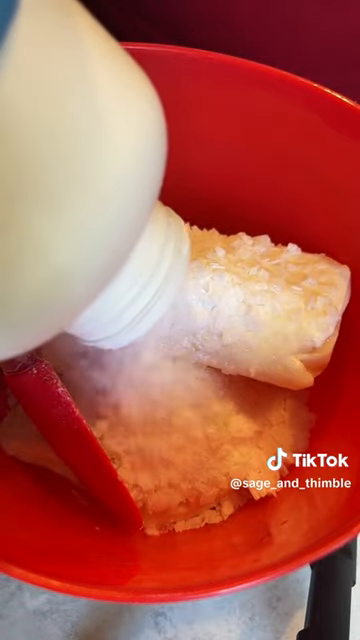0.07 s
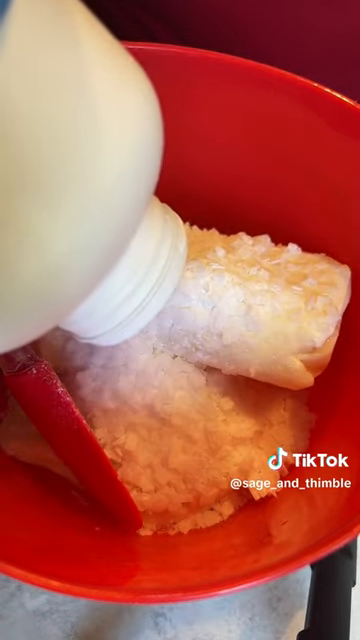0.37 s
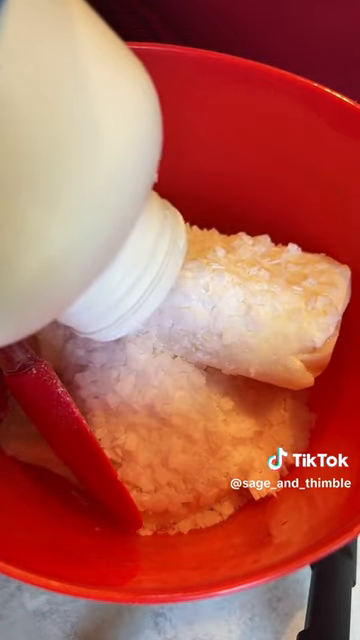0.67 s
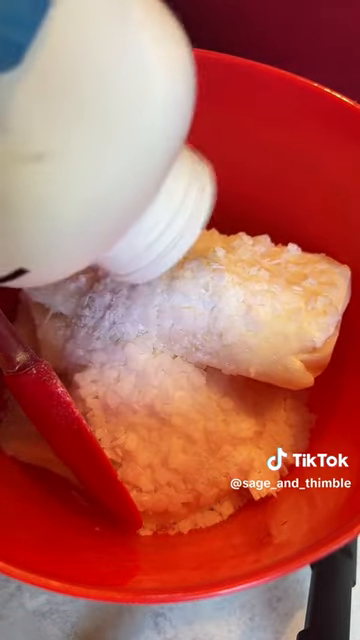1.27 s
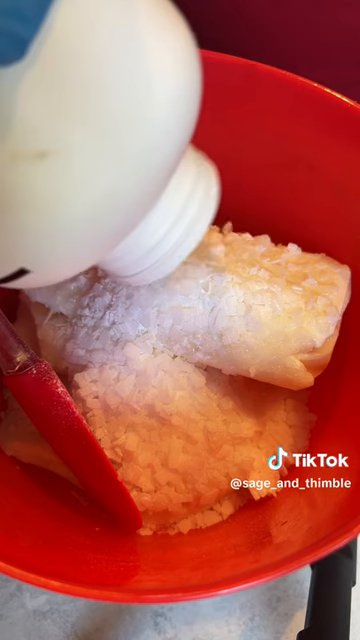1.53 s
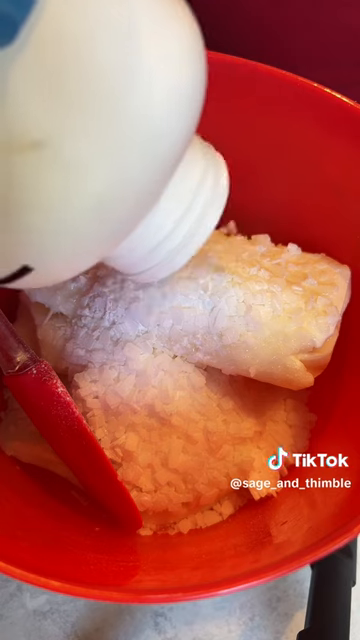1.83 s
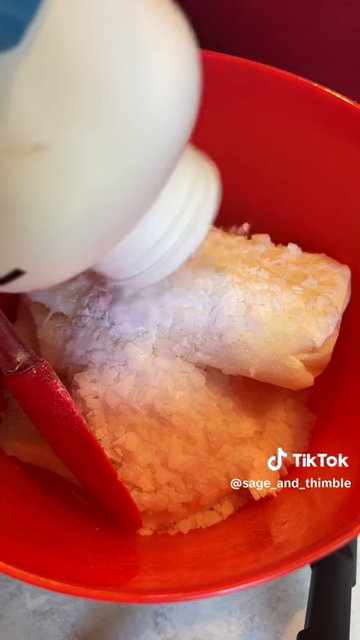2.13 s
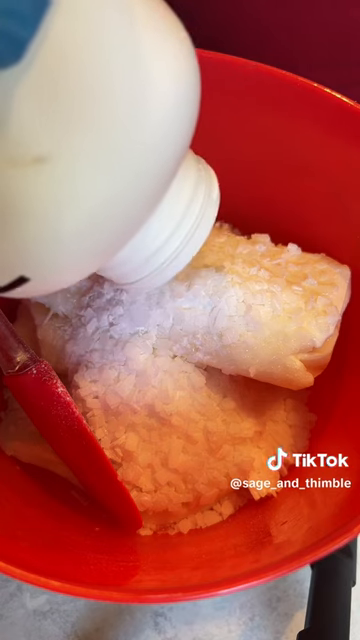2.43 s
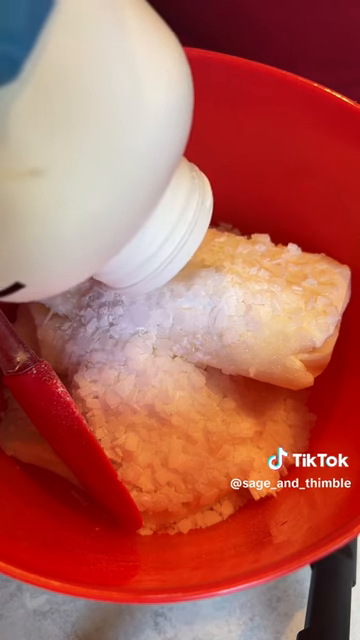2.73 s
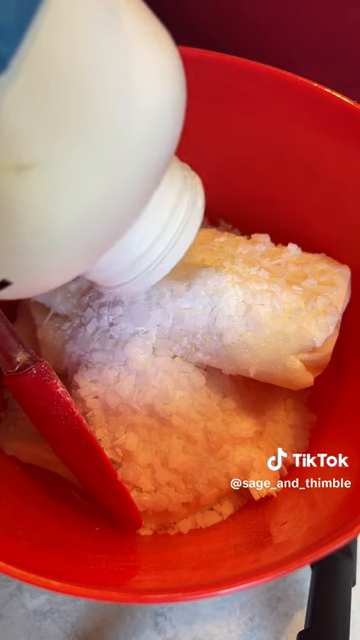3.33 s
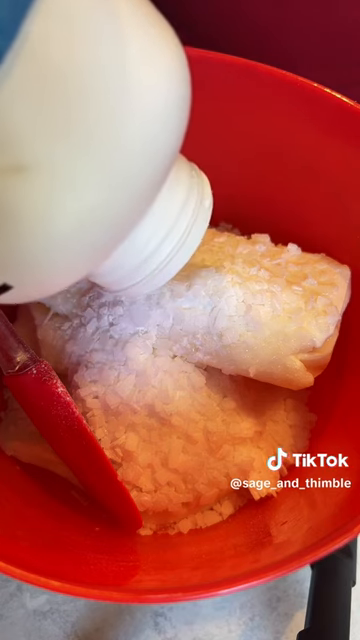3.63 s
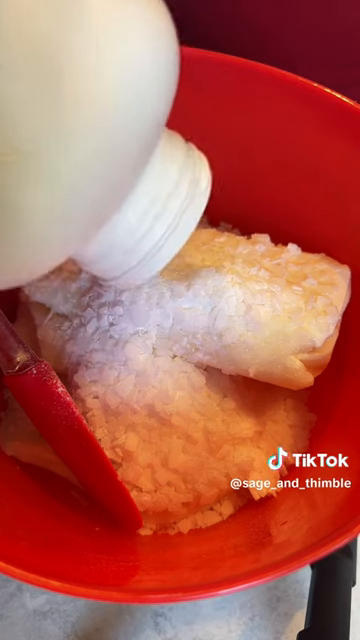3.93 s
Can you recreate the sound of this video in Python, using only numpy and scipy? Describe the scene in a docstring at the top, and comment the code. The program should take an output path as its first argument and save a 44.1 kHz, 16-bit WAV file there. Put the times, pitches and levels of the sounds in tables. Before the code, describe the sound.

Dry granules patter and tick as they are shaken from a plastic bottle onto food.

```python
"""A fine patter swells and stops, dotted with ticks: dry granules shaken from a plastic bottle
onto food in a bowl, close to the microphone. The stream is thousands of tiny impacts a second;
lumps tick against the bottle neck and the bowl, and a faint, high hiss comes and goes.
Low, uneven buffeting with soft bumps reaches the microphone; an appliance hums in the small room."""
import sys
import numpy as np
from scipy import signal
from scipy.fft import rfft, irfft, next_fast_len
from scipy.io import wavfile
from scipy.ndimage import uniform_filter1d, map_coordinates

SR = 44100
rng = np.random.default_rng(int(sys.argv[2]) if len(sys.argv) > 2 else 0)


def transcribe(signal):
    """Save signal, clipped to [-1, 1], as a 16-bit WAV file at the path in sys.argv[1]."""
    frames = np.atleast_2d(signal).T
    limited = np.clip(frames, -1, 1)
    pcm = np.round(limited * 32767).astype(np.int16)
    wavfile.write(sys.argv[1], SR, pcm)


N = 176400


def stream():
    """Granules land in little clumps, as loud as the flow."""
    # flow envelope: t/s, level/dB
    flow = [(0, -51.5), (.12, -49), (.14, -66), (.2, -60), (.26, -60), (.34, -53), (.42, -63.5), (1.1, -69),
            (1.18, -46.5), (1.215, -54), (1.31, -46), (1.34, -53.5), (1.385, -46), (1.48, -56),
            (1.51, -46.5), (1.55, -54), (1.67, -46), (1.72, -54), (1.745, -53), (1.8, -47), (1.855, -48),
            (1.885, -44), (1.93, -54.5), (1.97, -43.5), (2.01, -50), (2.06, -40.5), (2.13, -45),
            (2.18, -43.5), (2.23, -55.5), (2.28, -44.5), (2.345, -49), (2.41, -47.5), (2.495, -56),
            (2.525, -58.5), (2.7, -75)]
    # impact spectrum: f/Hz, level/dB
    colour = [(300, -26), (480, -12.5), (600, 5.5), (750, -14), (1500, -1), (2200, 0.5), (2480, 3),
              (2750, -3.5), (3150, -1), (4100, -2), (4700, -5), (8300, -7.5), (10500, -16.5), (12000, -25),
              (14000, -11.5), (16000, -29)]
    gain_db, flutter_db, flutter_per_s = -1, 1.4, 110
    return patter(colour) * amp(curve(flow) + gain_db + flutter_db * wobble(flutter_per_s))


def patter(colour):
    """Tiny impacts of random time and strength, each ringing with the colour; rms 1."""
    grains_per_s, spread_db = 4500, 3.8
    lands = rng.random(N) < grains_per_s / SR
    grains = lands * rng.standard_normal(N) * amp(spread_db * rng.standard_normal(N))
    return unit(signal.fftconvolve(grains, ring(colour))[:N])


def lump_ticks(size=2200):
    """Each lump snaps on contact and crumbles for a few milliseconds; a short, faint diffuse tail follows."""
    # lump and bottle ticks: t/s, level/dB, bass/dB, treble/dB, top octave/dB (bands re the middle)
    ticks = [(.0028, -32.5, -29, -11, -11), (.0093, -33.5, -23, -5, -13), (0.1473, -27.5, -34, -8, -21),
             (0.1813, -33.5, -18, -6, -17), (0.1856, -32, -16, 1, -8), (0.2, -34, -19, 0, -14),
             (.2992, -32.5, -11.5, -13, -23), (.333, -44, -21, -6, -27), (.3468, -44.5, -18, -9, -24),
             (0.4695, -42, -6, 13, -4), (0.7631, -34.5, -25, 0, -14), (1.255, -43.5, -5, 0, 0),
             (1.3832, -38.5, 0.5, 0, -8), (1.42, -45, -1, -8, -22), (1.588, -39, -10, -10.5, -23),
             (1.633, -44, -10, -4, -5), (1.659, -35.5, 2.5, 2, -15), (1.6715, -31.5, -8, -17, -27),
             (1.7099, -37, -2, -4, -11), (1.7838, -28, -6.5, -13, -20), (1.8004, -34.5, -14, -2, -19),
             (1.8232, -43, -13, -10, -21), (1.8634, -34, -13, -8.5, -24), (1.8778, -39, -7, 0, -6),
             (1.9105, -42, -11, -12, -10), (1.9405, -40, -1, -13, -8), (1.9771, -34.5, -3, -6, -12.5),
             (1.9955, -42, -12, -22, -35), (2.0226, -35.5, -10, -11, -9), (2.036, -37.5, 7, 7, -4),
             (2.049, -29.5, -10, -7, -22), (2.061, -43.5, -18, -6, -9), (2.0925, -47, -17, -16, -20),
             (2.1306, -42, -21, -13, -20), (2.1514, -38.5, -10, -8, -26), (2.1923, -42.5, 4, -12, -15),
             (2.2527, -40, -9, -7, -20), (2.2931, -32.5, -7, 1, -9), (2.3412, -39, -16, -6.5, -9),
             (2.3698, -38, -16, -14, -33), (2.4213, -43, -2, -6, -14), (2.4968, -48.5, 0, 4, -5),
             (2.7442, -46.5, -5, -5, -12), (2.8241, -39.5, -3, -3, -10), (3.026, -43.5, -1, -11, -33),
             (3.0333, -42, 0, -11, -23)]
    # spectrum of the usual tick: f/Hz, level/dB
    colour = [(300, -22.5), (900, -12.5), (1600, -8.5), (2500, 2.5), (3700, 0.5), (5000, -1.5),
              (8200, -2.5), (10500, -16), (14000, -17), (16000, -16)]
    usual_bass_db, usual_treble_db, usual_top_db = -10.5, -3, -14
    gain_db, snap_db = 23.5, -8.5
    crumble_s, spread_db = 0.0045, 3
    tail_s, tail_db = 0.0086, -2.5
    out, t = np.zeros(N + SR), np.arange(size) / SR
    for start_s, db, bass_db, treble_db, top_db in ticks:
        sizes, spikes, diffuse = rng.standard_normal((3, size))
        fragments = unit(sizes * amp(spread_db * spikes)) * np.exp(-(t / crumble_s) ** 2)
        bowl = amp(tail_db) * diffuse * np.exp(-t / tail_s)
        hits = fragments + bowl
        hits /= np.linalg.norm(hits)
        hits[0] += amp(snap_db)
        tilt = [(1400, bass_db - usual_bass_db), (3500, 0),
                (7500, treble_db - usual_treble_db), (12000, top_db - usual_top_db)]
        tick = amp(db + gain_db) * signal.fftconvolve(hits, ring(colour, tilt))
        out[round(start_s * SR):][:len(tick)] += tick
    return out[:N]


def high_hiss():
    """Wisps of faint, high hiss: one just before the tick at 0.76 s; the others are fine powder."""
    # wisps: start/s, length/s, level/dB
    wisps = [(-.03, 0.17, -50), (0.456, .08, -64), (0.704, 0.07, -71), (1.6, 0.36, -55.5),
             (2.03, .5, -58.5), (3.29, 0.25, -71.5)]
    # hiss spectrum: f/Hz, level/dB
    colour = [(2500, -25), (6000, 6.5), (8500, 3), (11000, -9), (14000, 0), (16000, -5)]
    swell, t = np.zeros(N), np.arange(N) / SR
    for start_s, length_s, db in wisps:
        progress = np.clip((t - start_s) / length_s, 0, 1)
        swell += amp(db) * np.sqrt(np.abs(np.sin(np.pi * progress)))
    return swell * patter(colour)


def buffeting():
    """Low, uneven rumble on the microphone, with short soft bumps."""
    # rumble envelope: t/s, level/dB
    strength = [(0, -42), (.25, -48), (.39, -39), (.44, -44), (.48, -28.5), (.71, -29.5), (.77, -35.5),
                (.815, -28), (.91, -33.5), (.945, -39), (1.0, -36), (1.2, -29), (1.27, -32.5), (1.32, -29),
                (1.39, -36), (1.47, -33.5), (1.5, -27), (1.57, -31), (1.63, -32), (1.73, -32), (1.8, -41.5),
                (1.94, -34.5), (2.0, -41), (2.24, -47), (2.45, -30), (2.56, -30), (2.66, -34.5),
                (2.87, -32), (2.91, -43), (3.06, -36.5), (3.14, -42.5), (3.2, -37.5), (3.35, -33),
                (3.48, -43), (3.6, -37), (3.68, -50), (3.84, -29), (4, -51.5)]
    # rumble spectrum: f/Hz, level/dB
    colour = [(15, -51), (25, -20), (40, -3), (62, 3.5), (90, -2.5), (122, -6.5), (160, -14.5),
              (210, -24.5), (280, -31.5), (420, -43), (900, -89)]
    # bumps: centre t/s, level/dB, f/Hz
    bumps = [(.487, -21.5, 75), (0.526, -27.5, 182), (.566, -24.5, 139), (0.656, -20, 98), (.675, -15, 95),
             (0.712, -22, 66), (.802, -28, 111), (0.816, -20.5, 62), (1.082, -25, 103), (1.3, -20, 72),
             (1.321, -22, 62), (1.571, -16, 68.5), (1.66, -19.5, 75), (1.757, -28, 54), (2.439, -29, 166),
             (2.466, -23, 93), (2.508, -23.5, 157), (2.528, -19.5, 146), (2.944, -26.5, 60),
             (3.197, -26, 59), (3.351, -23, 74), (3.408, -25.5, 65), (3.552, -19, 79)]
    rumble_gain_db, bump_gain_db, decay_cycles = -0.5, 3.5, 0.47
    rumble = noise(colour)
    power = np.abs(uniform_filter1d(rumble ** 2, size=2600))
    rumble /= np.sqrt(power + 1e-6)  # evens out the random swells
    out = rumble * amp(curve(strength) + rumble_gain_db)
    t = np.arange(N) / SR
    for centre_s, db, hz in bumps:
        cycles = hz * (centre_s - t)
        out += amp(db + bump_gain_db) * np.sin(2 * np.pi * cycles) * np.exp(-np.abs(cycles) / decay_cycles)
    return out


def room_echo(x, t60_s=0.16, build_s=0.0063, gain_db=-12.5):
    """Reflections in the small room build into a short diffuse tail."""
    t = np.arange(SR // 2) / SR
    tail = rng.standard_normal(len(t)) * amp(-60 * t / t60_s) * (1 - np.exp(-t / build_s))
    return amp(gain_db) * signal.fftconvolve(x, tail / np.linalg.norm(tail))[:N]


def appliance():
    """An appliance hums in wavering lines; the clearest, a whine, swells and fades."""
    # hum lines: f/Hz, level/dB
    lines = [(304, -65.5), (603, -66), (2490, -73), (4120, -74.5)]
    # whine envelope: t/s, level/dB
    whine = [(0, -63), (1.3, -61), (2.4, -62), (2.85, -66), (3.1, -61), (4, -67)]
    hum = sum(amp(db) * tone(hz) for hz, db in lines)
    return hum + amp(curve(whine)) * tone(hz=1733)


def whistle():
    """A faint, thin whistle swells once."""
    # envelope: t/s, level/dB
    swell = [(.2, -82), (.5, -70), (1.2, -83)]
    return amp(curve(swell)) * tone(hz=4720)


def room_noise(level_db=-50.5):
    """Steady noise of the room."""
    # spectrum: f/Hz, level/dB
    colour = [(100, -7.5), (250, -5.5), (429, -10), (586, -8.5), (735, -11), (1180, -10.5), (1260, -16),
              (1700, -14.5), (1850, -16.5), (3200, -17.5), (4200, -23), (5000, -27), (9200, -36.5),
              (10300, -51), (16000, -47)]
    return amp(level_db) * noise(colour)


def amp(db):
    """Decibels to gain."""
    return 10 ** (np.asarray(db) / 20)


def unit(x):
    """Scale to rms 1."""
    return x / np.sqrt(np.mean(x ** 2) + 1e-20)


def along(colour, hz):
    """Read (f/Hz, level/dB) rows on a log frequency axis."""
    knots_hz, db = np.transpose(colour)
    return np.interp(np.log(hz + 1), np.log(knots_hz + 1), db)


def curve(rows):
    """Read (t/s, value) rows at every sample."""
    return np.interp(np.arange(N) / SR, *np.transpose(rows))


def wobble(knots_per_s):
    """Smooth random curve."""
    knots = rng.standard_normal(int(N * knots_per_s / SR) + 4)
    return map_coordinates(knots, [np.arange(N) * knots_per_s / SR])


def noise(colour):
    """Coloured noise, rms 1."""
    gain = amp(along(colour, np.fft.rfftfreq(N, 1 / SR)))
    return unit(irfft(rfft(rng.standard_normal(N)) * gain, N))


def ring(*colours, size=1024):
    """Minimum-phase impulse response of the summed colours, energy 1."""
    hz = np.fft.rfftfreq(size, 1 / SR)
    cepstrum = irfft(np.log(amp(sum(along(c, hz) for c in colours))))
    cepstrum[1:size // 2] *= 2
    cepstrum[size // 2 + 1:] = 0
    response = irfft(np.exp(rfft(cepstrum)))
    return response / np.linalg.norm(response)


def tone(hz, waver_hz=7.09):
    """Sine of slightly wavering pitch, rms 1."""
    pitch_hz = hz + waver_hz * wobble(knots_per_s=30)
    return np.sqrt(2) * np.sin(2 * np.pi * np.cumsum(pitch_hz) / SR)


def scene():
    """The pour and its echo over buffeting and background; mono."""
    pour = lump_ticks() + stream() + high_hiss()
    return (pour + room_echo(pour) + buffeting() + appliance() + whistle() + room_noise())[None]


def record(dry):
    """Brick-wall low-pass."""
    top_hz = 16100
    size = next_fast_len(N + SR // 2)
    passband = np.fft.rfftfreq(size, 1 / SR) < top_hz
    return irfft(rfft(dry, size) * passband, size)[..., :N]


dry = scene()
out = record(dry)
transcribe(out)
```